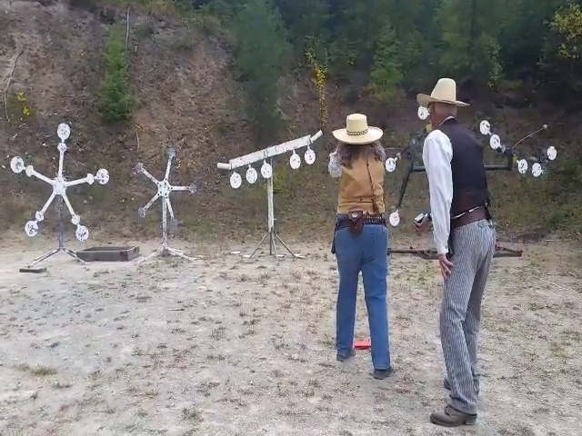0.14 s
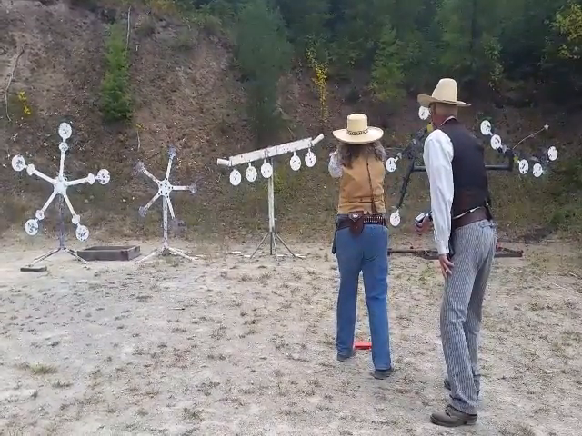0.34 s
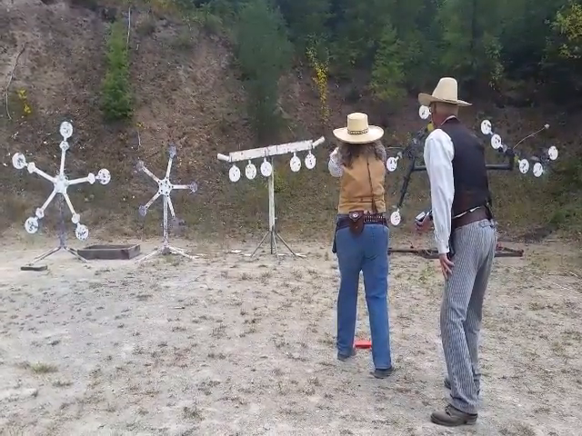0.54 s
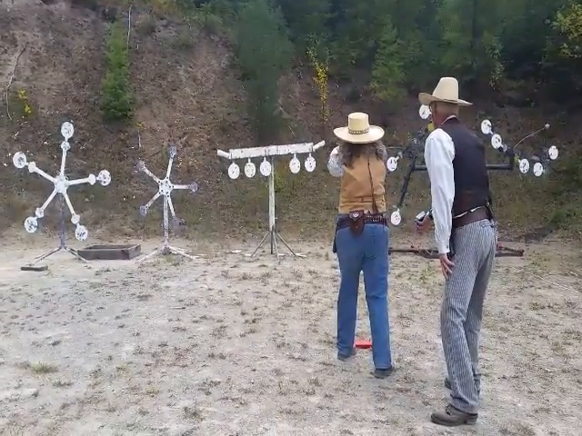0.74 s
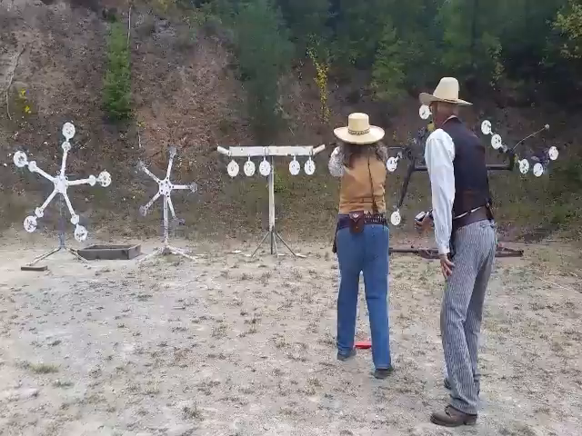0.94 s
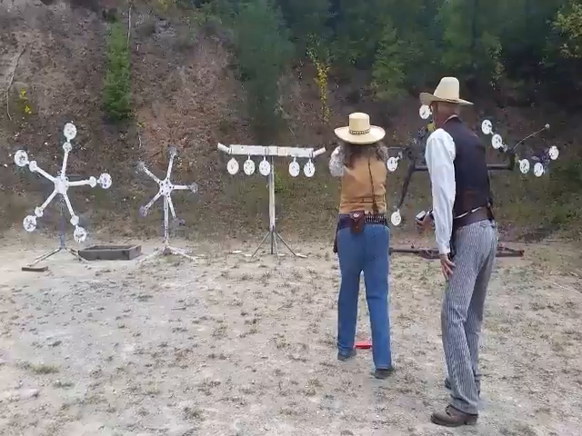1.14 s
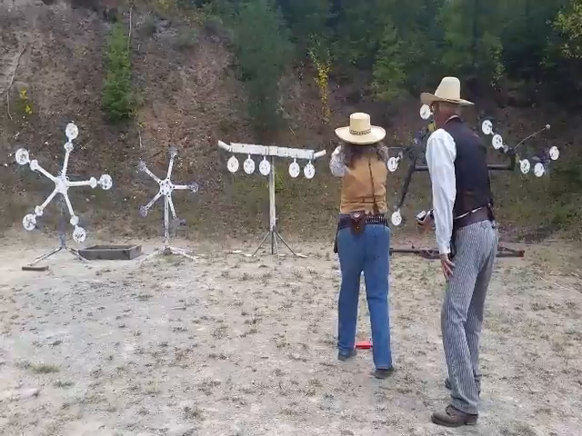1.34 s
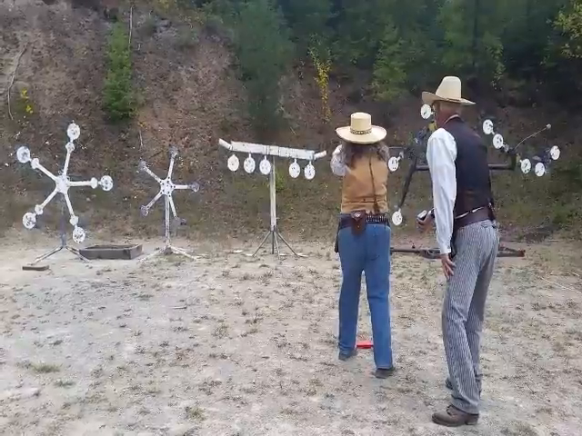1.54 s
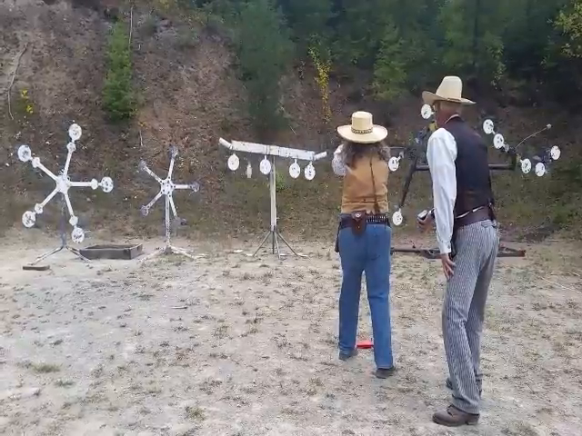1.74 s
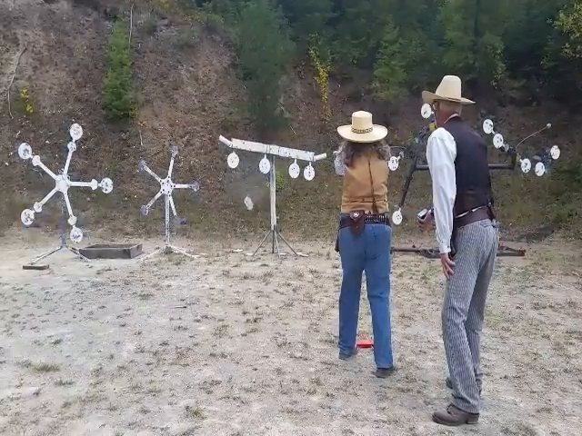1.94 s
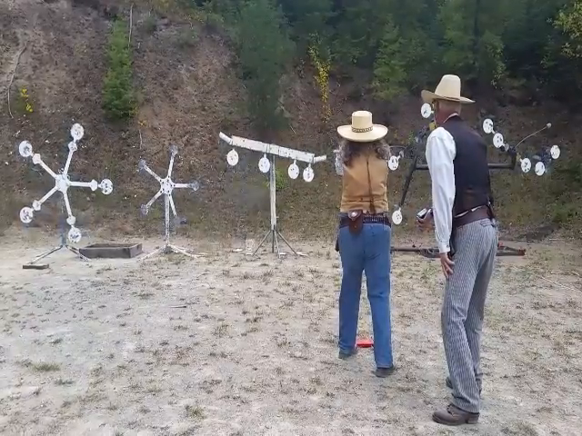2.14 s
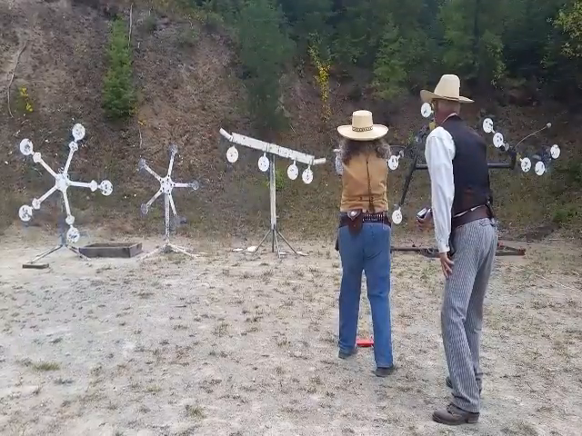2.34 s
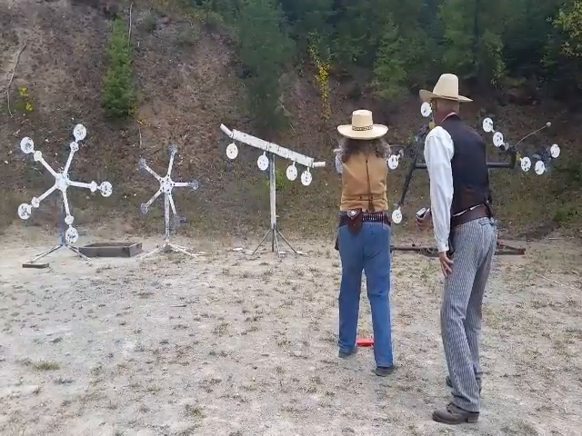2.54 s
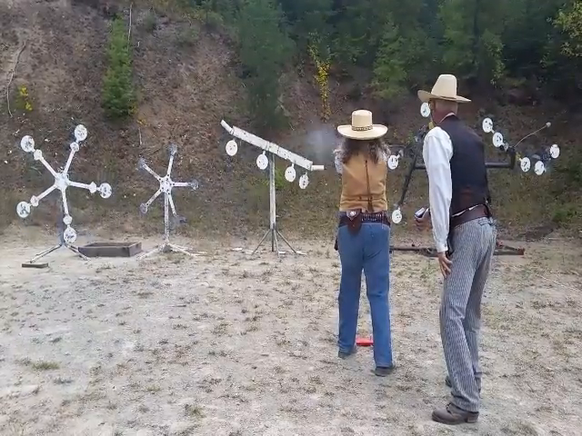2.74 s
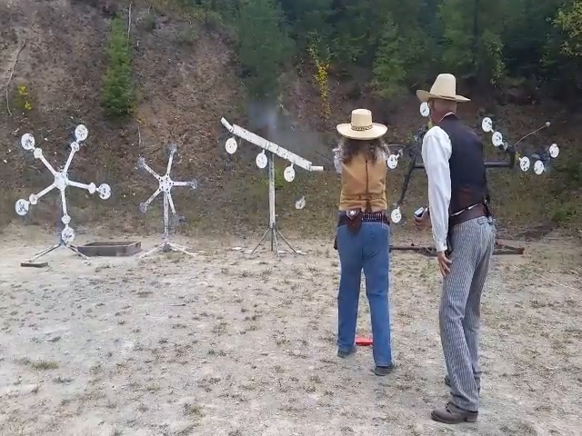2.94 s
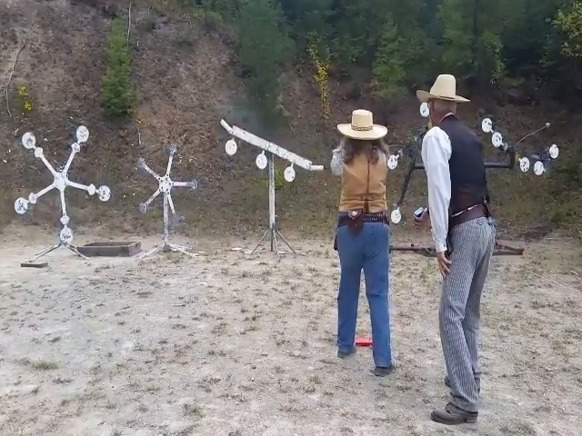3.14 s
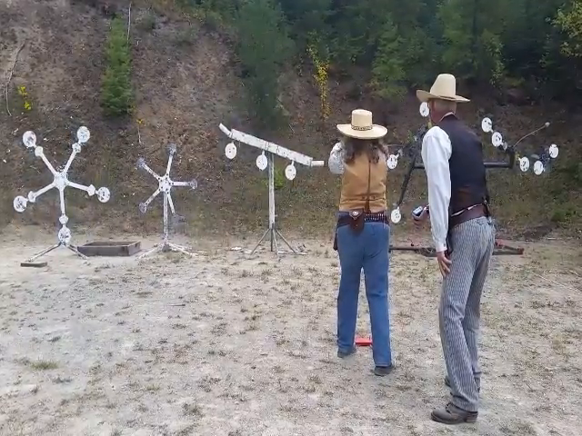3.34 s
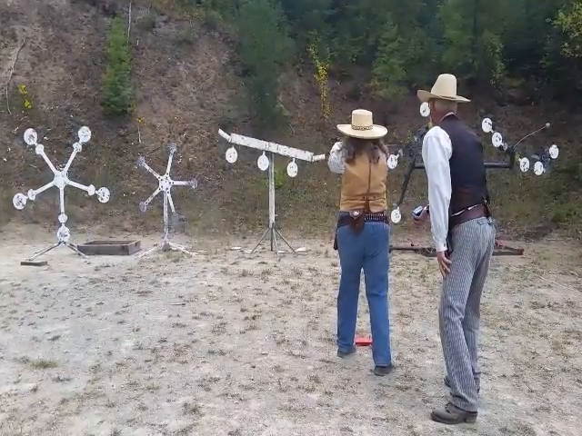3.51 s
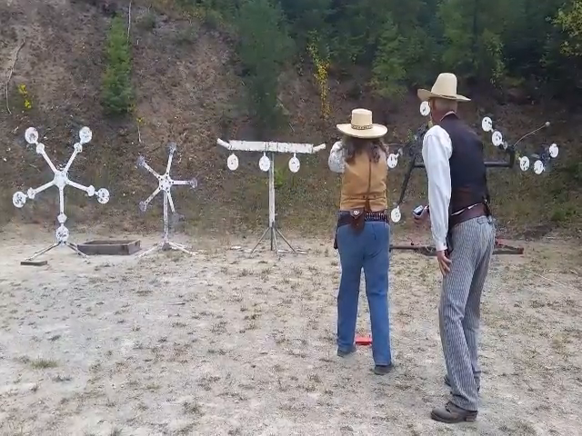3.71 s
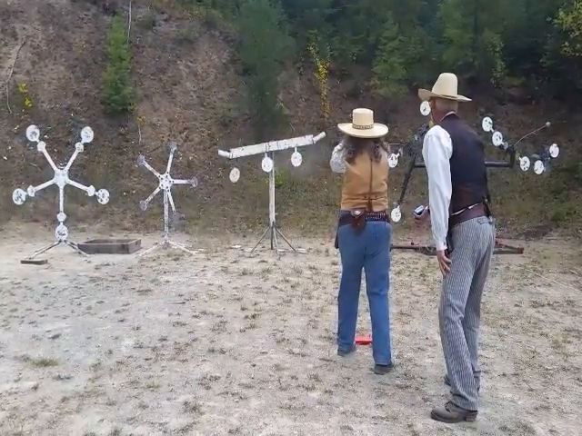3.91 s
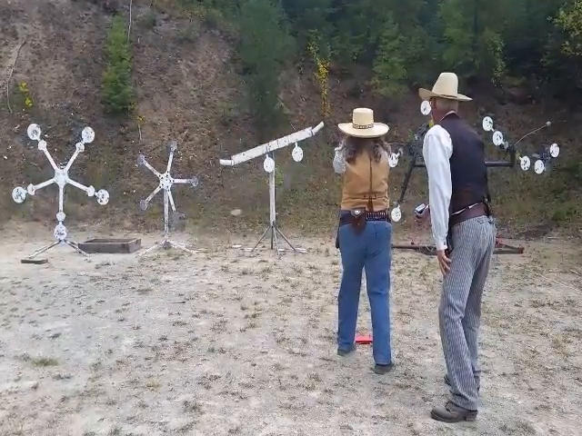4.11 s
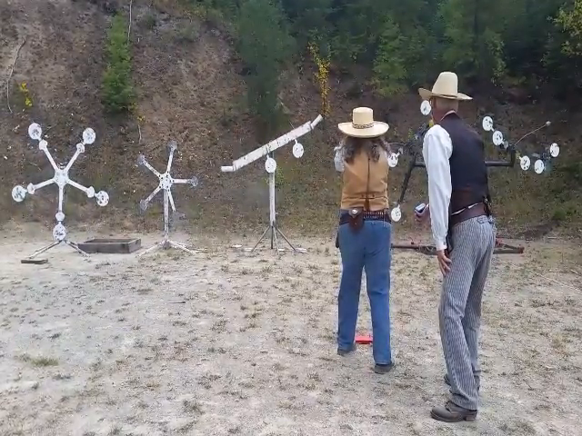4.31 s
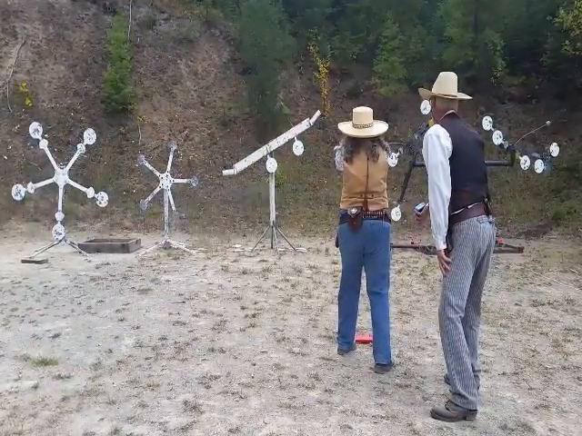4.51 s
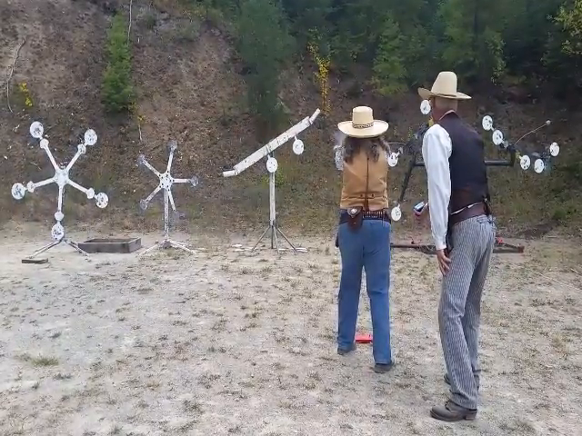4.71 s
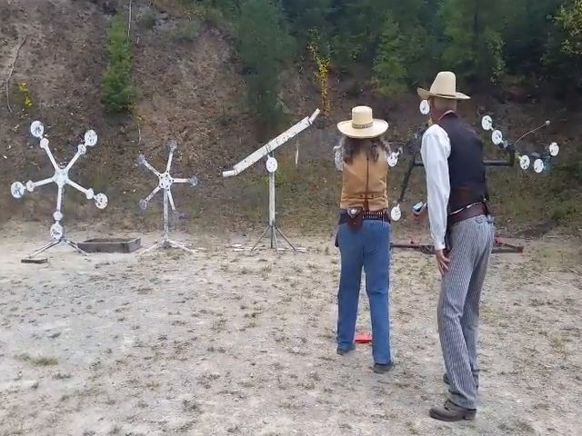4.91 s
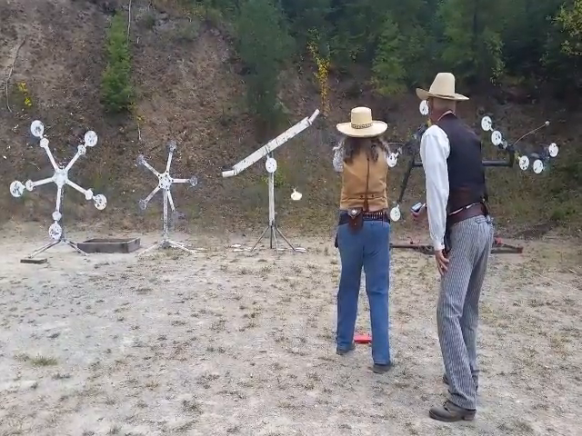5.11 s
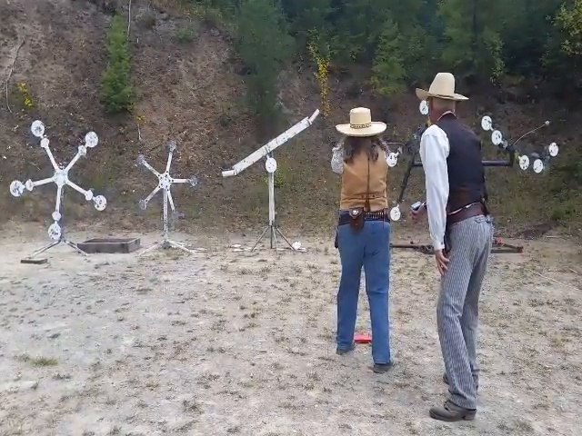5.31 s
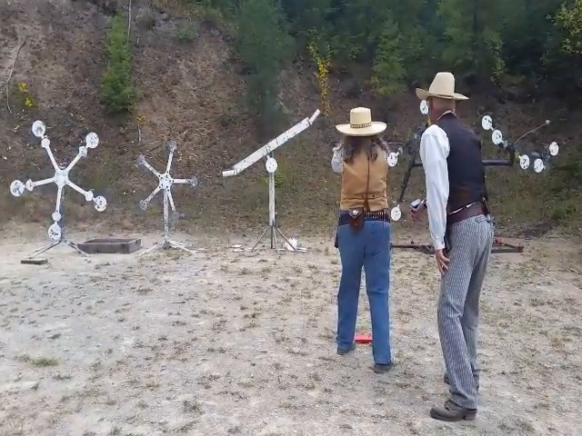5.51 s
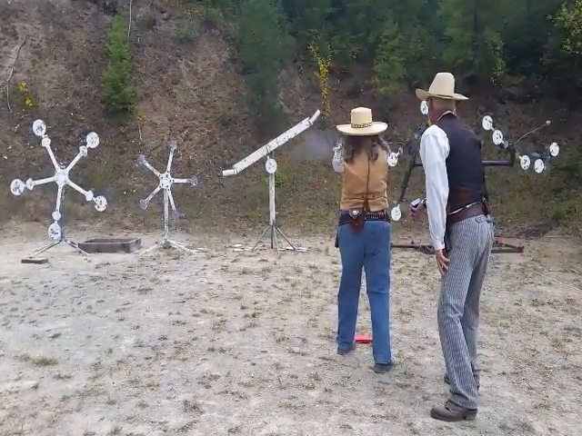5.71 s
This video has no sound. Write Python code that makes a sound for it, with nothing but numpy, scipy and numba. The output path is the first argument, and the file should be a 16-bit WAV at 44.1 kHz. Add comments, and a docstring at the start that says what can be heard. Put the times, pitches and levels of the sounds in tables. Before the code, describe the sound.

Sharp gunshots echo across an open range as steel targets clang, fall and ring on gravel, with light wind on the microphone.

```python
"""Revolver shots at steel plates

Five shots crack across an open range as an earlier one dies away. Each bullet clangs a steel plate
off a rack; the plates tumble, land and bounce ringing on gravel. Every blast echoes from nearby walls,
then washes back from an earth bank and trees. The hammer clicks between shots, and gusts buffet
the microphone's two openings (ports) over a faint hush."""
import sys
import numpy as np
from scipy import signal
from scipy.fft import rfft, irfft, next_fast_len
from scipy.io import wavfile
from scipy.ndimage import uniform_filter1d
from numba import njit

SR = 44100
rng = np.random.default_rng(int(sys.argv[2]) if len(sys.argv) > 2 else 0)


def wav_out(sig):
    """Save sig, one row per channel (or a flat mono array), as 16-bit PCM at SR to the path in sys.argv[1]."""
    wavfile.write(sys.argv[1], SR, np.round(np.clip(np.atleast_2d(sig).T, -1, 1) * 32767).astype(np.int16))


N = 258466
LEAD_S = 220 / SR  # shaped noise starts this early so its filter can settle
# Below, "pan" is left minus right in dB, and a "fade time" is the seconds taken to drop 60 dB.

# Each row: start in seconds, blast level in dB, pan, bass and treble of its echo wash in dB.
SHOTS = [(-.35, -17, -10, 4.5, -9), (1.6255, -5.5, -3.5, 1, 10), (2.699, 1.5, 1.5, 2, 9.5),
         (3.8037, -2, 3, -1, 8.5), (4.7646, -3.5, -3, -4.9, 6.5), (5.6805, -2, 4, 0.1, 9.5)]
# The direct blast, then its echoes off props and walls.
# Each row: delay in ms, pop level in dB, crack level in dB, crack length in ms, added pan.
BLAST_PATHS = [(0, 1.5, 3.5, 6.5, 3.5), (13.05, -15.5, -14.5, 3.2, -7), (20.57, -8, -23.5, 2.9, -0.5),
               (26.71, -3, -10.5, 1.4, -2)]
# The tones of the pop. Each row: pitch in Hz, level in dB, fade time.
POP_TONES = [(940, -0.5, 0.0098), (120, -15, 0.046), (2594, -16, 0.04)]
# The crack's colour (how strong its lows and highs are). Each row: frequency in Hz, level in dB.
CRACK_COLOUR = [(35, -27.5), (60, 4.5), (527, 1), (2650, -8.5), (3850, -25), (4530, -12), (5590, -27.5),
                (7750, -13.5), (10500, -36), (13300, -28), (16000, -47.5)]


def blasts():
    """The burst of gas pops the gun's surroundings and a short crack follows; echoes flip the pop."""
    out, t = np.zeros((2, N)), np.arange(2048) / SR
    pop = sum(undb(db) * np.sin(2 * np.pi * hz * t) * undb(-60 * t / t60) for hz, db, t60 in POP_TONES)
    for start, db, pan_db, *_ in SHOTS:
        for echo, (delay_ms, pop_db, crack_db, length_ms, side_db) in enumerate(BLAST_PATHS):
            burst = np.minimum(t / 0.00066, 1) / (1 + (t * 1000 / length_ms) ** 6)
            crack = undb(crack_db) * burst * noise(CRACK_COLOUR, len(t))
            blast = (-1 if echo else 1) * undb(pop_db) * pop + crack
            add(out, start + delay_ms / 1000, undb(db) * blast, pan_db + side_db)
    return out


# Hits on the plates, by bullet or ground. Each row: start in seconds, knock level in dB, ring level
# in dB, spot (0 centre, 1 rim), softness in dB lost per octave, favoured pitch in Hz,
# ring length factor, spin in turns per second, facing angle in radians.
HITS = [(1.659, -16, -33, 0.2254, 4.5, 3330, 1.74, 7.94, -1.5),
        (2.176, -14, -47, 0.92, -1, 2315, 1.29, 4.6, 0.059),
        (2.443, -33.5, -45, 1, 11, 1200, 0.63, 8.8, 0.66),
        (2.463, -27.5, -51.5, 0.98, -1.3, 6840, 1.26, 6.2, -1.1),
        (2.732, -11.5, -26.5, 0.04, 1, 4250, 1.01, 2.04, 0.11),
        (3.212, -19, -38.5, 0.92, 4.5, 1836, 0.85, 9.8, -0.45),
        (3.221, -16, -45, 0.84, -1.5, 2315, 1.1, 7.2, 0.4),
        (3.519, -30, -48, 0.76, 10.5, 2834, 0.83, 9.9, 0.97),
        (3.659, -60, -63.5, 0.94, 11, 2315, 0.47, 11.4, 0.42),
        (3.7, -31.5, -46.5, 0.76, 12.5, 2830, 0.46, 13, 0.55),
        (3.836, -8.5, -29.5, 0.082, 3.5, 4390, 1.1, 2.8, 0.13),
        (4.798, -15, -32, 0.68, 3.5, 1836, 1.6, 12.6, 0.98),
        (5.345, -22, -34, 0.95, 7, 2940, 0.68, 8.9, 0.93),
        (5.36, -17, -50.5, 0.83, -2.7, 7400, 1.26, 7.9, 0.33),
        (5.567, -48, -47.5, 0.94, 8.5, 2930, 0.48, 9.5, 1),
        (5.712, -7.5, -29.5, 0.43, 5, 1836, 1.06, 8.9, 0.88)]
# A plate's ringing tones. Each row: pitch in Hz, level in dB, basic fade time.
PLATE_TONES = [(1060, -4.5, 0.5), (1199, -4, 0.46), (1332, -4.5, 0.6), (1841.5, -0.5, 0.47),
               (2327, 2.5, 0.62), (2798, 3.5, 0.62), (3167, 0, 0.58), (4356, -2.44, 0.56), (4514, -34.5, 2),
               (4500, -4, 1.1), (4610, -2, 0.35), (4730, 2.5, 0.3), (6174, 5.5, 0.41), (6270, 4.5, 0.36),
               (7240, -4, 0.78), (7570, 0.5, 0.46), (8020, -1, 0.33), (8940, -1.5, 0.44),
               (9760, -0.5, 0.36), (10740, -3, 0.31), (11640, -4.5, 0.43), (11000, -9, .4),
               (12000, -8.5, 0.36), (12600, -2, .3), (14120, -14.5, .2)]
# The pitches in Hz that divide those tones into nine families.
FAMILY_EDGES_HZ = [1500, 2000, 2500, 3500, 4450, 5000, 7000, 8500]
# Hits at the centre, halfway out and on the rim. Each row: the nine families' levels in dB.
FAMILY_LEVELS = [(-8, -15, -11.5, -10, -1.5, -21.5, -24, -4.5, -4.5),
                 (-9, -5, -1.5, -5.5, 2, -12.5, -16, -11, -14),
                 (-0.5, 0, -4.5, -1.5, -14, -7, -6, -2, -4.5)]
# The ports face apart, which tilts the treble. Each row: frequency in Hz, pan.
TONE_PAN = [(2000, -0.5), (4400, 12.5), (8000, -5.5)]
# Lead on steel, steel on gravel, and gravel thrown up. Each row: frequency in Hz, level in dB.
BULLET_COLOUR = [(300, -26.5), (1000, 1.5), (3000, 1), (5500, -14), (7500, -1.5), (12000, -18),
                 (16000, -22.5)]
LANDING_COLOUR = [(300, -10), (700, -1.5), (2500, -1), (3800, -15.5), (7500, -39.5), (12000, -45),
                  (16000, -54.5)]
SPRAY_COLOUR = [(500, -22), (2500, 2), (7500, -6), (12000, -16), (16000, -32)]


def plates(pan_db=4, twin_db=-11, twin_detune=0.0033, favoured_db=10.5, scatter_db=10.5):
    """Each hit knocks a round plate and rings its tones, which come in close pairs (twins)."""
    out, t = np.zeros((2, N)), np.arange(40000) / SR
    hz, db, t60 = np.repeat(np.transpose(PLATE_TONES), 2, axis=1)
    twin = np.arange(len(hz)) % 2
    family = np.searchsorted(FAMILY_EDGES_HZ, hz)
    tilt = undb(on_log(TONE_PAN, hz) / 2)
    highpass = signal.butter(2, 4000, "high", fs=SR, output="sos")
    for start, knock_db, ring_db, spot, soft_db, favoured_hz, lasting, spin_hz, angle in HITS:
        by_bullet = min(abs(start - shot[0]) for shot in SHOTS) < .05
        tumble, rattle, treble_rattle = (.79, .2, .1) if by_bullet else (.36, .35, .45)
        level_luck, pitch_luck, treble_luck = rng.standard_normal((3, len(hz)))
        phase = np.exp(2j * np.pi * rng.random(len(hz)))
        family_db = np.array([np.interp(spot, [0, .5, 1], row) for row in np.transpose(FAMILY_LEVELS)])
        tone_db = db + ring_db + family_db[family] + twin * twin_db - soft_db * np.log2(hz / 2300)
        # the tone that moves most at the struck spot gets a lift
        tone_db += favoured_db * np.exp(-(np.log(hz / favoured_hz) / .05) ** 2)
        # high tones and weak tones change most with the exact spot
        tone_db -= 6 * (hz > 5000) * (abs(treble_luck) - .5)
        tone_db -= scatter_db * abs(level_luck) * np.clip(twin - db / 7.2, 0, 1.5)
        tone_hz = hz * (1 + twin_detune * twin * pitch_luck)
        step = np.exp((2j * np.pi * tone_hz - np.log(1000) / (lasting * t60)) / SR)
        # each family beams its own way, and the right port meets the beam a little later
        left = np.exp(1j * (angle + 2.23 * (family - 4)))
        right = left * np.exp(-0.92j)
        spin = np.exp(2j * np.pi * spin_hz / SR)
        clang = ring(undb(tone_db) * phase, step, tilt, left, right, spin, tumble, len(t))
        # loose mounts and gravel chatter against the plate, roughening the treble most
        chatter = 1 + rattle * flutter(220, len(t))
        clang += treble_rattle * flutter(500, len(t)) * signal.sosfilt(highpass, clang)
        # the next hit grips the plate and mutes part of the old ring
        next_hit = min([hit[0] - start for hit in HITS if hit[0] - start > .05] + [1])
        mute = np.where(t > next_hit, undb(-15), 1)
        attack = np.minimum(t / 0.00043, 1)
        add(out, start, clang * chatter * mute * attack, pan_db)
        colour = BULLET_COLOUR if by_bullet else LANDING_COLOUR
        add(out, start - LEAD_S, knock(colour, knock_db, soft_db), pan_db)
        if not by_bullet:
            add(out, start - LEAD_S, gravel_spray(knock_db, soft_db), pan_db)
    return out + ground_scatter(out)


@njit
def ring(strength, step, tilt, left, right, spin, depth, count):
    """Fading tones that swell and dip at each port as the plate tumbles."""
    out = np.zeros((2, count))
    for m in range(len(strength)):
        tone, to_left, to_right = strength[m], left[m], right[m]
        for i in range(count):
            tone *= step[m]
            to_left, to_right = to_left * spin, to_right * spin
            out[0, i] += tone.imag * (1 + depth * to_left.imag) * tilt[m]
            out[1, i] += tone.imag * (1 + depth * to_right.imag) / tilt[m]
    return out


def knock(colour, db, soft_db):
    """The contact itself: a snap of noise, duller for a softer hit."""
    t = np.arange(4096) / SR
    fade = undb(-60 * t / 0.016) + undb(-20.5 - 60 * t / 0.12)
    softened = [(hz, level - 1.5 * soft_db * max(np.log2(hz / 3000), 0)) for hz, level in colour]
    grit = noise(softened, len(t), fade)
    return undb(db - 1.5) * (grit + .5 * grit[::-1])


def gravel_spray(knock_db, soft_db, fade_s=.45):
    """A landing throws up gravel, which patters down."""
    t = np.arange(16384) / SR
    patter = undb(-60 * t / fade_s + 1.2 * flutter(240, len(t)))
    return undb(knock_db - 30 - 0.68 * soft_db) * noise(SPRAY_COLOUR, len(t), patter)


def ground_scatter(sound, db=-13, fade_s=0.65):
    """The ground scatters a sound into a short, soft tail."""
    t = np.arange(16384) / SR
    tail = rng.standard_normal((2, len(t))) * undb(-60 * t / fade_s)
    tail /= np.sqrt(np.sum(tail ** 2, axis=1, keepdims=True))
    return undb(db) * signal.fftconvolve(sound, tail, axes=1)[:, :N]


# The colour of the echo wash. Each row: frequency in Hz, level in dB.
WASH_COLOUR = [(40, -19), (80, -3), (200, -1.5), (650, -3), (1100, -9.5), (1550, -13.5), (2700, -13),
               (3900, -24.5), (5500, -23), (7700, -19), (10500, -27.5), (14000, -31), (16000, -39)]
# Each row: frequency in Hz, basic fade time of the wash.
WASH_FADE = [(60, 0.86), (260, 0.39), (700, 0.61), (1840, 0.88), (4850, 0.86), (9000, 0.68), (15000, 0.52)]
# Each row: frequency in Hz, how alike left and right are (1 the same, -1 opposite).
STEREO_LIKENESS = [(60, 0.93), (640, 0.87), (1400, -0.58), (3100, 0.13), (6800, -0.15)]
# Echoes that stand out, dull from the bank and bright from the trees.
# Each row: delay in seconds, spread in seconds, centre in Hz, lift in dB.
CLEAR_ECHOES = [(0.078, 0.023, 713, 9), (0.148, 0.013, 9200, 2.5)]


def echo_wash(level_db=-16.5, build_db=-9.5, build_s=0.066, linger_db_per_s=57, linger_from_s=0.36):
    """Countless echoes of each shot blur into noise; each half octave fades at its own rate."""
    size, t = next_fast_len(N), np.arange(0, N + 64, 64) / SR
    hz = np.fft.rfftfreq(size, 1 / SR)
    alike, colour = on_log(STEREO_LIKENESS, hz), undb(on_log(WASH_COLOUR, hz))
    mid, side = rfft(rng.standard_normal((2, size))) * np.sqrt([1 + alike, 1 - alike]) * colour
    spectrum = np.array([mid + side, mid - side]) / np.sqrt(2 * np.mean(colour ** 2))
    half_octaves = 2 * np.log2(np.maximum(hz, 1) / 40)
    out = np.zeros((2, N))
    for k in range(19):
        centre_hz, power = 40 * 2 ** (k / 2), 0
        for start, _, _, bass_db, treble_db in SHOTS:
            age = np.maximum(t - start, 0)
            db = level_db + on_log([(150, bass_db), (1000, 0), (8000, treble_db)], centre_hz)
            db += build_db * np.exp(-age / build_s) - 60 * age / on_log(WASH_FADE, centre_hz)
            db += linger_db_per_s * np.maximum(age - linger_from_s, 0)  # far trees answer late
            for delay, spread, echo_hz, lift_db in CLEAR_ECHOES:
                db += lift_db * np.exp(-((age - delay) / spread) ** 2 - np.log2(centre_hz / echo_hz) ** 2)
            db -= centre_hz / 101 * age ** 2  # air and leaves eat the treble of far echoes
            power += (t > start) * undb(2 * db)
        band = irfft(spectrum * np.clip(1 - abs(half_octaves - k), 0, 1), size)[:, :N]
        out += band * np.interp(np.arange(N) / SR, t, np.sqrt(power))
    return out * undb(1.1 * flutter(40) + 1.9 * flutter(250))


# The hammer is drawn back. Each row: start in seconds, level in dB.
HAMMER_CLICKS = [(2.119, -46), (3.130, -39.5), (4.241, -40.5), (5.203, -43.5)]
# Small clicks, perhaps gravel and grit. Each row: start in seconds, level in dB, centre in Hz, pan.
SMALL_CLICKS = [(.265, -42.5, 1730, 16), (2.357, -18.5, 770, -17), (3.443, -35, 1500, 2),
                (3.469, -27.5, 930, 28), (4.318, -24.5, 735, 1), (4.379, -50, 4550, 9),
                (4.548, -39, 1510, 0.5), (4.573, -39, 1830, 3.5), (5.505, -48, 1500, -4)]


def clicks(hammer_hz=6400, fade_s=0.028):
    """The hammer and other small things tick: bursts of noise with a little tail."""
    out, t = np.zeros((2, N)), np.arange(1024) / SR
    hammer = [(start, db, hammer_hz, 0) for start, db in HAMMER_CLICKS]
    for start, db, hz, pan_db in hammer + SMALL_CLICKS:
        colour = [(hz / 3.1, -30), (hz / 4.8, 0), (hz * 1.1, 0), (hz * 3.9, -40), (hz * 8, -70)]
        grit = noise(colour, len(t), undb(-60 * t / fade_s))
        add(out, start - LEAD_S, undb(db - 7.5) * (grit + 0.56 * grit[::-1]), pan_db)
    return out


# Each row: time in seconds, strength of the gust in dB.
GUST_STRENGTH = [(0.0, -49.5), (.13, -60), (0.868, -74.5), (1.85, -70.5), (2.05, -46), (2.27, -30),
                 (2.38, -32.5), (2.45, -39), (2.68, -41), (2.95, -36), (3.3, -31), (3.79, -46), (4.18, -46),
                 (4.3, -35.5), (4.42, -51.5), (4.72, -62.5), (5.0, -52.5), (5.55, -38), (5.86, -44.5)]
# Wind rumbling on a port. Each row: frequency in Hz, level in dB.
RUMBLE_COLOUR = [(12, -39), (20, -3.5), (75, 4), (146, 0), (416, -14.5), (755, -24.5), (1500, -38),
                 (1950, -55.5), (3300, -120)]
# Swirls of air. Each row: peak time in seconds, level in dB, pitch in Hz, port (0 left, 1 right).
EDDIES = [(0.434, -30.5, 81, 0), (2.108, -17, 133, 0), (2.138, -19.5, 104, 0), (2.262, -9.5, 117, 0),
          (2.331, -10, 160, 0), (2.359, -14.5, 168, 1), (2.506, -18.5, 247, 0), (2.652, -20, 296, 0),
          (2.972, -8, 130, 0), (2.991, -10, 177, 0), (3.049, -19.5, 116, 0), (3.202, -17, 121, 0),
          (3.238, -20, 154, 0), (3.274, -16.5, 110, 0), (3.381, -21.5, 189, 0), (3.473, -15, 128, 0),
          (3.689, -21.5, 140.6, 0), (4.246, -20.5, 130, 0), (4.289, -20, 128, 0), (5.358, -19, 111, 0),
          (5.625, -25.5, 124, 0)]


def wind(windward_db=7):
    """Gusts rumble on each port, more on the left, which faces the wind; eddies add short thumps."""
    gust_db = np.interp(np.arange(N) / SR, *np.transpose(GUST_STRENGTH))
    side_db = np.array([[windward_db], [-windward_db]]) / 2
    out = noise(RUMBLE_COLOUR, N) * undb(gust_db + side_db + 7.7 * np.tanh(flutter(35)))
    t = np.arange(-1024, 1024) / SR
    for peak, db, hz, port in EDDIES + lesser_eddies():
        rough = noise(RUMBLE_COLOUR, len(t))[0]
        eddy = np.cos(2 * np.pi * hz * t + rng.uniform(0, 2 * np.pi)) + 0.56 * rough
        swell = np.exp(-(t * hz / 0.66) ** 2)  # one or two cycles long
        i = int(peak * SR) - 1024
        out[int(port), i:i + len(t)] += undb(db) * eddy * swell
    return out + 0.11 * out[::-1]  # a little pressure reaches the other port


def lesser_eddies(count=90, usual_hz=144):
    """Random eddies that grow with the gust, about four in five on the windward port."""
    when, weakness, pitch, side = rng.random((count, 4)).T
    peak = .05 + when * (N / SR - .1)
    db = np.interp(peak, *np.transpose(GUST_STRENGTH)) + 13 - 3 * np.log(0.22 + weakness)
    return list(zip(peak, db, usual_hz * 2 ** (pitch - .5), side > .8))


# The background hush. Each row: frequency in Hz, level in dB.
HUSH_COLOUR = [(88, -34), (150, -3), (406, -11), (637, -6.5), (2450, -19.5), (4490, -42), (16000, -43)]


def hush(level_db=-62):
    """Far leaves and traffic blend into soft, steady noise."""
    x = noise(HUSH_COLOUR, N)
    return undb(level_db + .8 * flutter(45)) * (x + 0.11 * x[::-1])


def undb(db):
    """Turn decibels into a gain."""
    return 10 ** (np.asarray(db) / 20)


def on_log(table, hz):
    """Read between (Hz, value) rows, giving every octave equal room."""
    row_hz, values = np.transpose(table)
    return np.interp(np.log(np.maximum(hz, 1)), np.log(row_hz), values)


def noise(colour, size, envelope=1.):
    """Separate left and right noises, shaped in loudness and then given their colour."""
    padded = next_fast_len(size + 512, True)
    gain = undb(on_log(colour, np.fft.rfftfreq(padded, 1 / SR)))
    x = irfft(rfft(rng.standard_normal((2, size)) * envelope, padded) * gain, padded)
    return np.roll(x, 220, axis=1)[:, :size] / np.sqrt(np.mean(gain ** 2))


def flutter(rate_hz, size=N):
    """A smooth random wobble for each port, typically about 1 either side of zero."""
    hold = int(SR / rate_hz)
    steps = rng.standard_normal((2, 1024))[:, np.arange(size) // hold % 1024]
    return uniform_filter1d(uniform_filter1d(steps, hold), hold) / np.sqrt(.55)


def add(out, start, sound, pan_db):
    """Mix a sound in, panned, at a start time in seconds."""
    i = int(round(start * SR))
    panned = (sound * undb([[pan_db / 2], [-pan_db / 2]]))[:, max(-i, 0):N - i]
    out[:, max(i, 0):max(i, 0) + panned.shape[1]] += panned


def scene():
    """All the sounds meet at the microphone."""
    return blasts() + echo_wash() + plates() + clicks() + wind() + hush()


def record(dry):
    """The microphone drops the deepest bass; its electronics round off the blasts and cut the top."""
    x = signal.sosfilt(signal.butter(2, 36., "high", fs=SR, output="sos"), dry)
    x = .93 * np.tanh(x / .93)
    return signal.sosfilt(signal.ellip(10, .2, 70, 16300, fs=SR, output="sos"), x)


dry = scene()
out = record(dry)
wav_out(out)
```